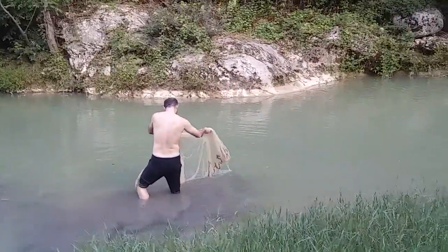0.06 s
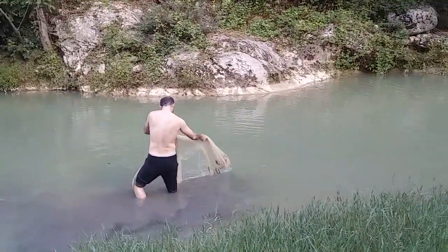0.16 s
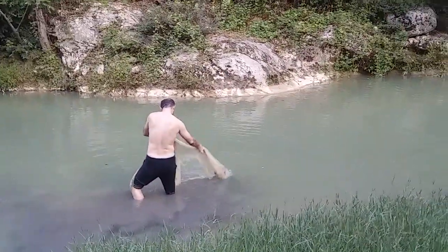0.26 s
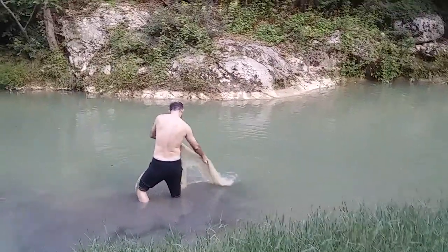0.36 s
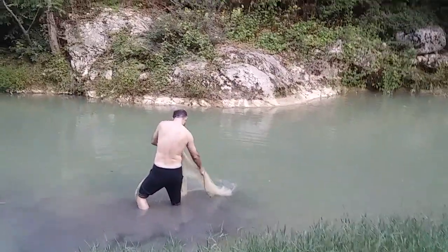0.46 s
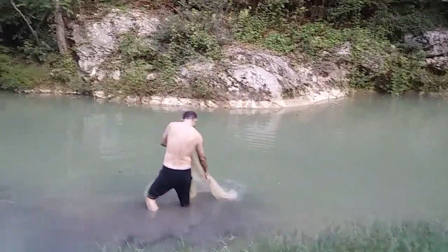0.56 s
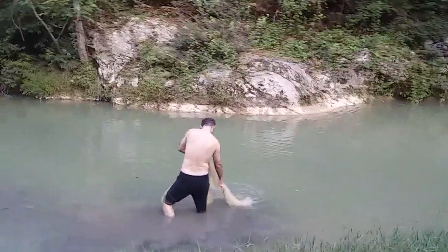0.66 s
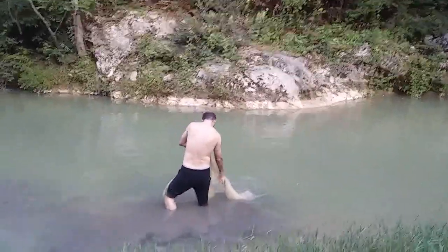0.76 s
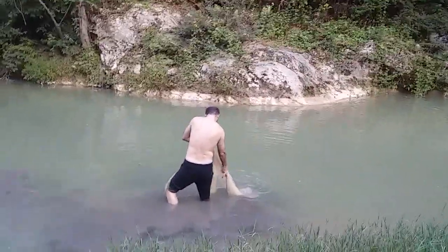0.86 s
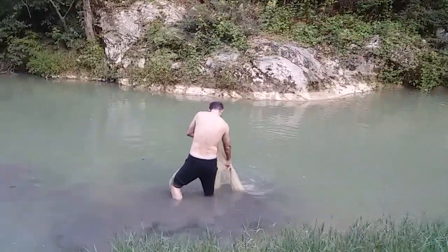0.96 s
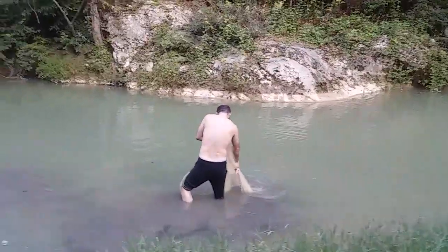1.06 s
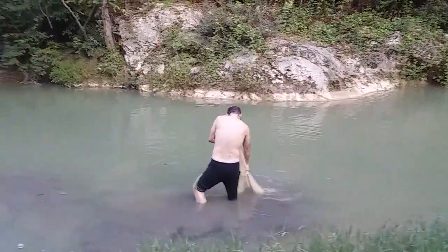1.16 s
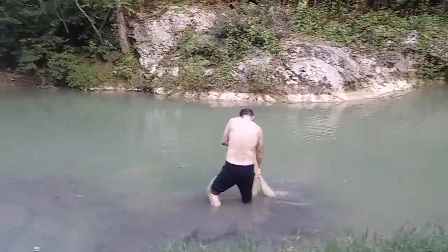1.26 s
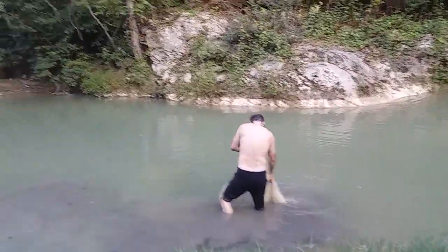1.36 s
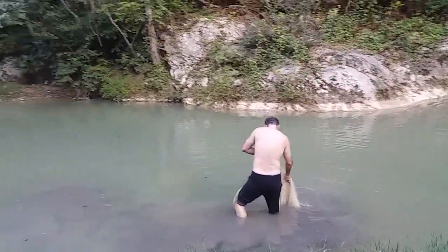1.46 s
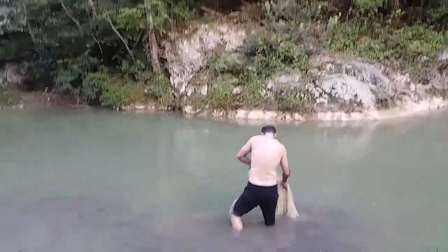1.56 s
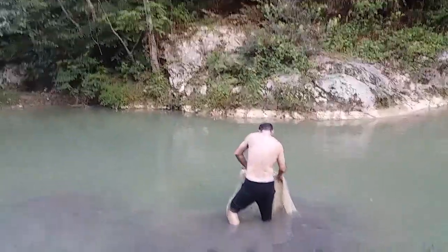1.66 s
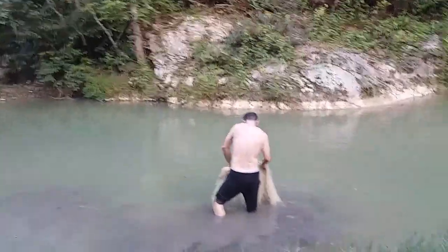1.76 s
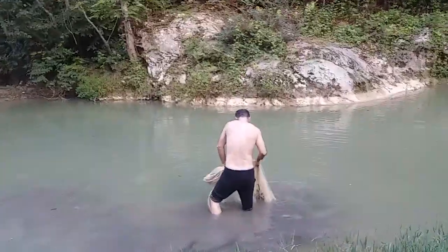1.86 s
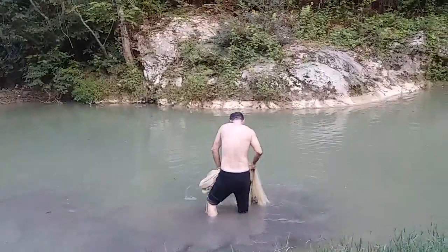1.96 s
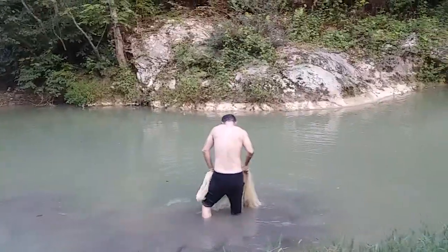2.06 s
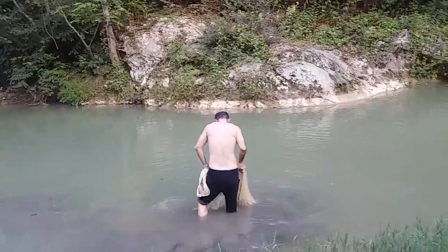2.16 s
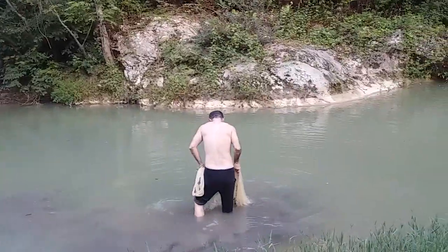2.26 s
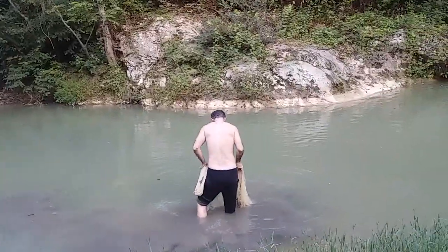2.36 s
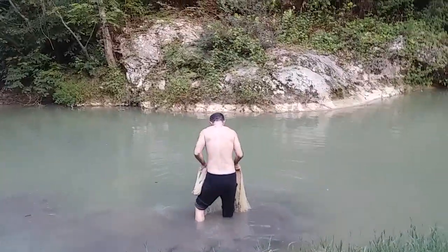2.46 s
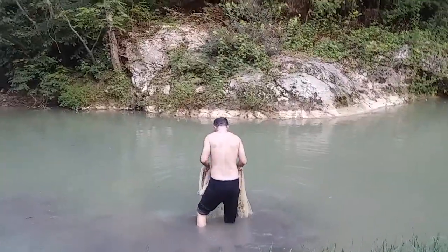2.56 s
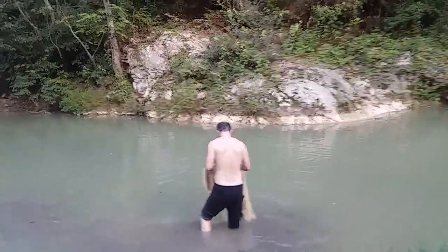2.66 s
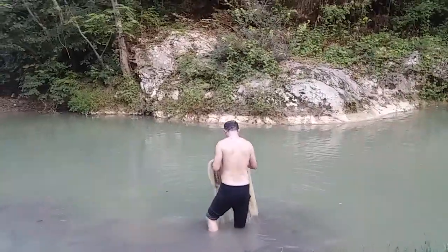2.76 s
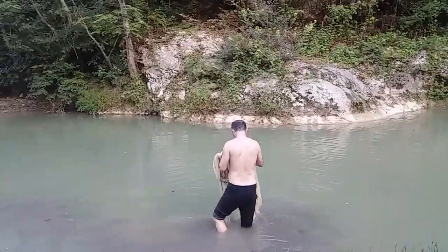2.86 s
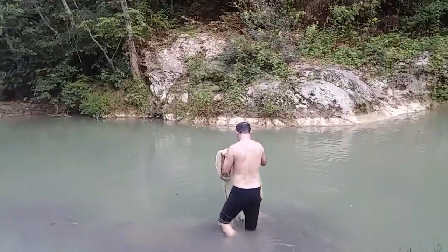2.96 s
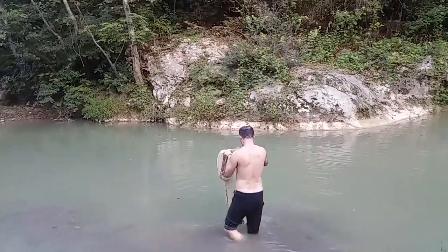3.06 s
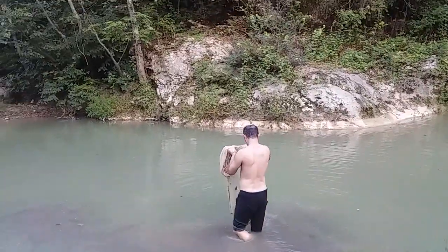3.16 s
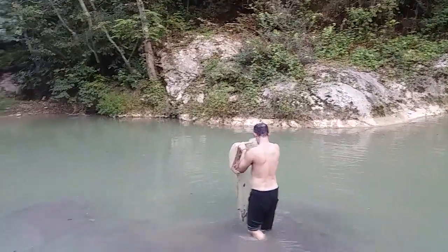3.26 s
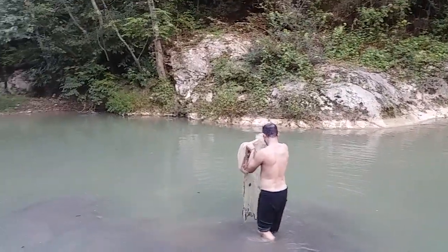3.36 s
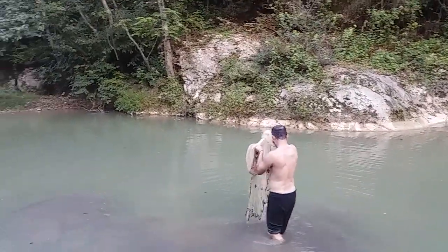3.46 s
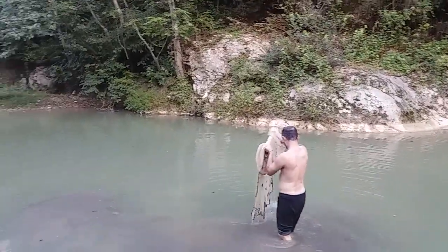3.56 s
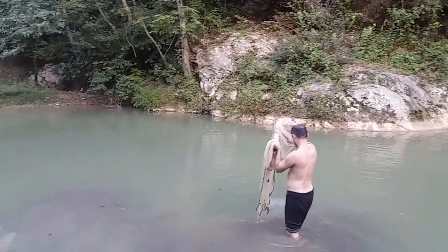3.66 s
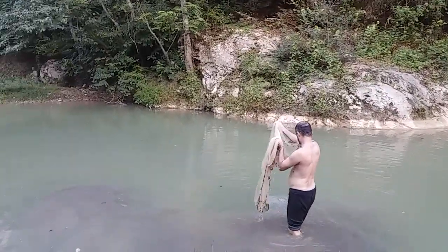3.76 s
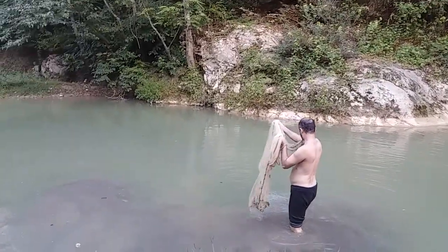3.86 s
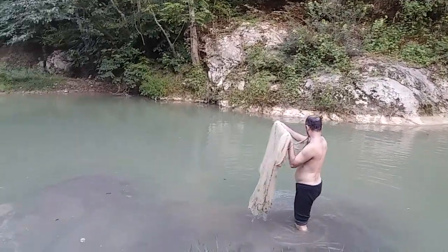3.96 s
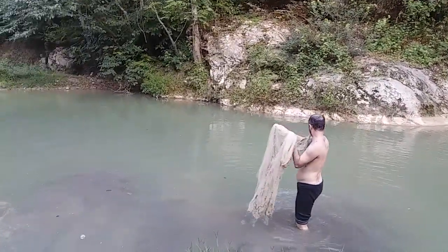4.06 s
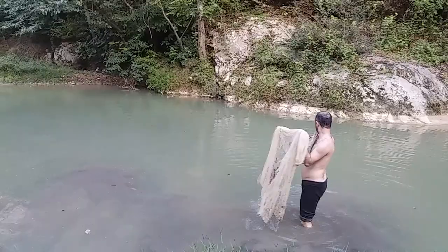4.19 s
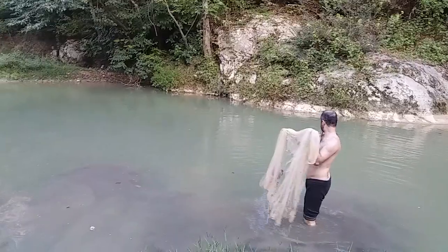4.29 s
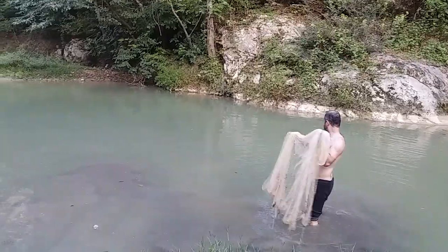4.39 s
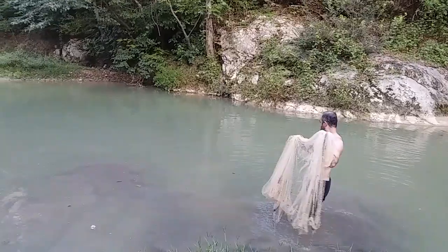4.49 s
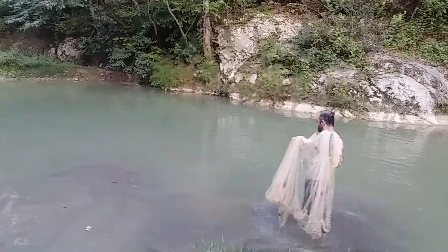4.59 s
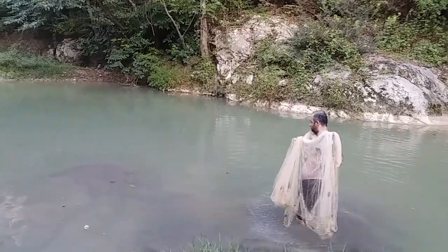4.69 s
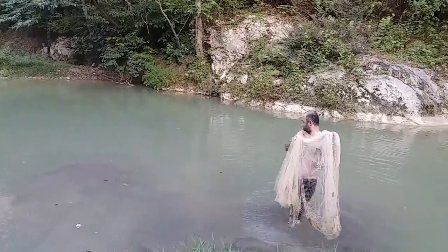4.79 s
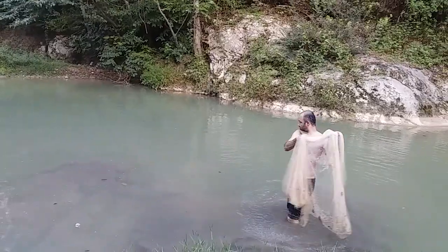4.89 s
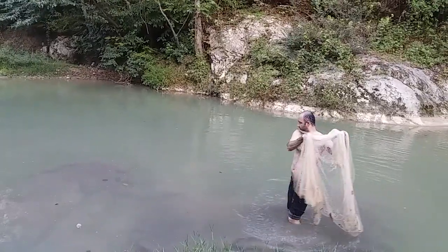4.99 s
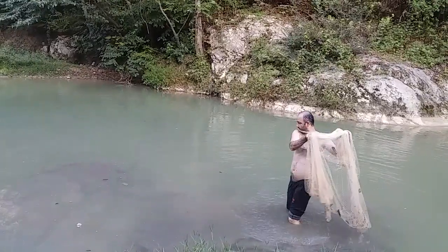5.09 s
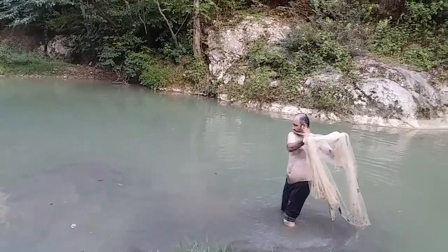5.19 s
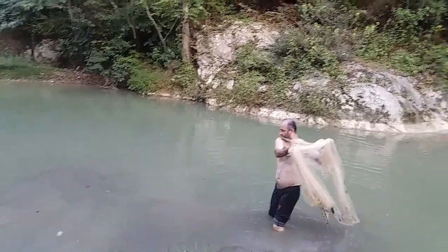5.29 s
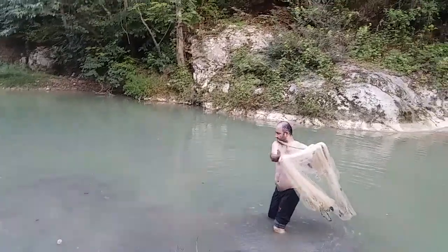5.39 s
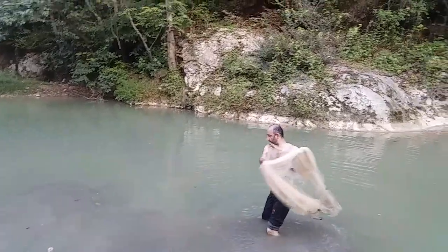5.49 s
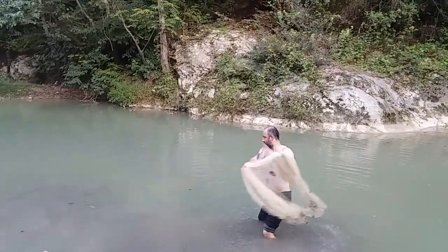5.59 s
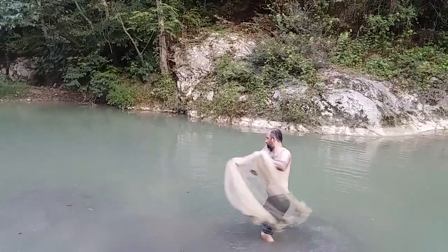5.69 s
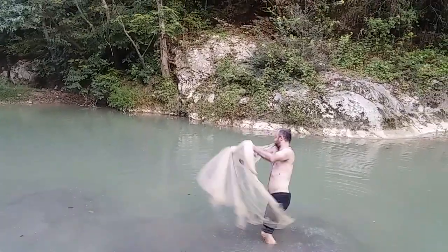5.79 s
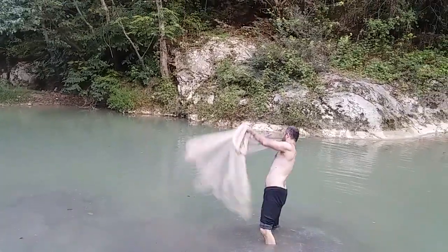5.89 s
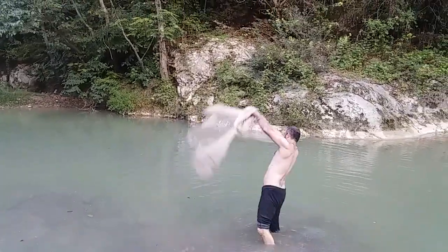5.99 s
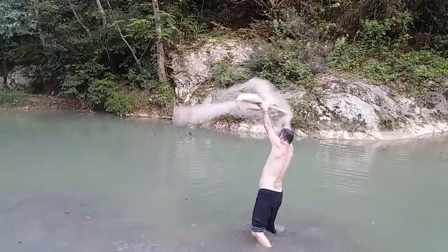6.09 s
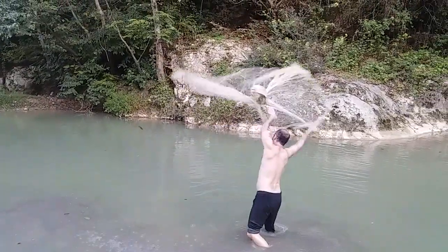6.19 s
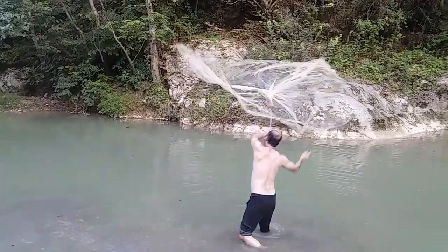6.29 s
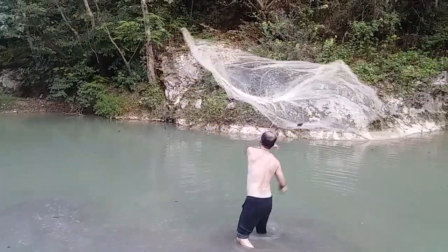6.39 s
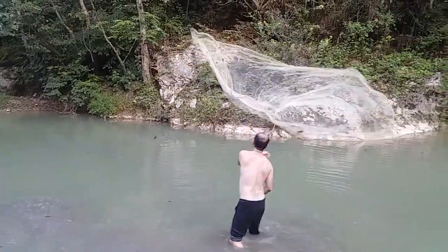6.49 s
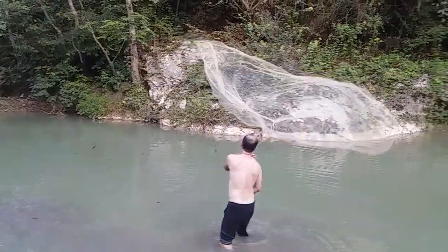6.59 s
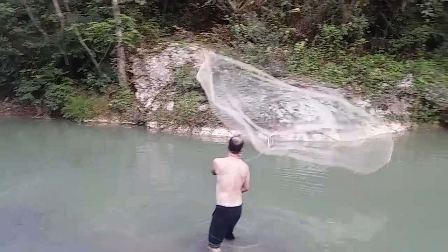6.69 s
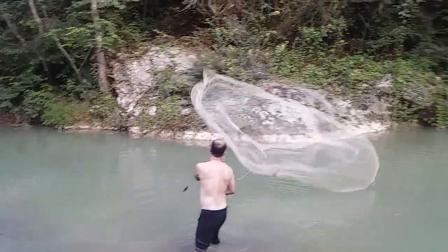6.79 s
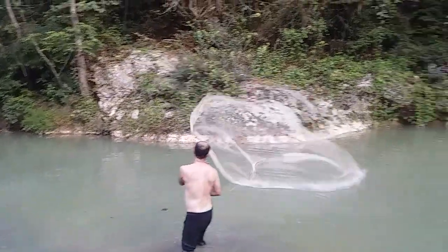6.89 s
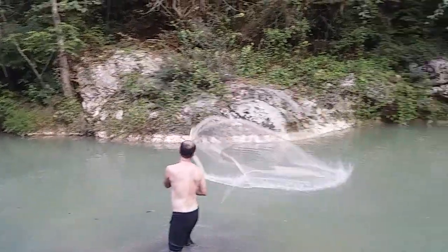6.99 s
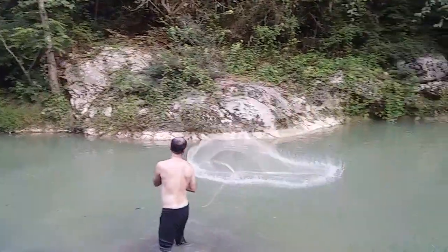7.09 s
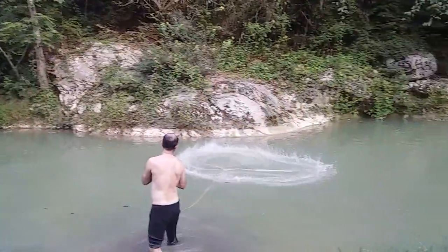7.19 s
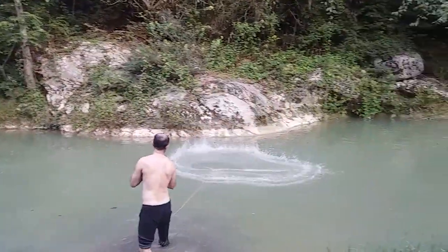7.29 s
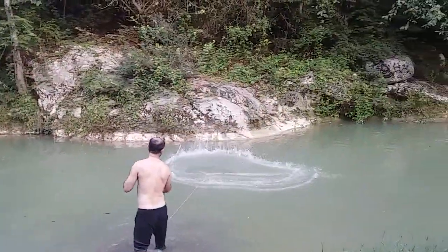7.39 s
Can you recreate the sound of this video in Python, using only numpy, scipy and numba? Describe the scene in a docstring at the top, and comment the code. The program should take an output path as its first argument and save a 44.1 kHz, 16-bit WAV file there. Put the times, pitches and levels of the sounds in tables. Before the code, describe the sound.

Quiet running water, crisp grass crunches under a few steps, legs sloshing and bright drips, then a weighted cast net bursts into the water.

```python
"""Wading in a shallow stream: legs stir the water, a gathered cast net drips, then its weighted rim lands
in a long splash. Water is built from swarms of ringing bubbles and drop impacts, with single gulps and drops on top.
Grass rustles, crackles and snaps under a few steps on the near bank, made of short knocks and ticks.
A noise wash with small bubbles babbles on as the stream, rock and bushes return a faint scattered echo,
and a thin steady sine whines high up."""
import sys
import numpy as np
from scipy import signal
from scipy.fft import rfft, irfft
from scipy.io import wavfile
from scipy.ndimage import uniform_filter1d
from numba import njit

SR = 44100
rng = np.random.default_rng(int(sys.argv[2]) if len(sys.argv) > 2 else 0)


def unload_wav(signal):
    """Save mono or channel-first audio to the path in sys.argv[1] as 16-bit WAV at rate SR, clipped to [-1, 1]."""
    wavfile.write(
        sys.argv[1],
        SR,
        np.round(np.clip(np.atleast_2d(signal).T, -1, 1) * 32767).astype(np.int16),
    )


N = 328545
TIME = np.arange(N) / SR

# Event levels are starting points: the layers that use them may trim, flutter or colour them.
# a leg pushes through the water: [peak t/s, rise/s, fall/s, slosh level/dB, deep surge level/dB]; 20 dB per rise or fall
STRIDES = [(.06, 0.41, 0.27, -54.5, -71), (.42, 0.45, 0.26, -49.5, -54.5), (1.38, 0.043, 0.076, -57, -59),
           (1.5, 0.1, 0.12, -51, -63.5), (3.06, 0.11, 0.098, -54, -74), (3.55, 0.54, 0.44, -49.5, -66),
           (5.73, .15, 0.072, -63, -88), (6.19, .3, 0.19, -51.5, -75), (6.44, 0.1, 0.13, -54, -62),
           (6.72, 0.17, 0.087, -52.5, -58)]
# the wet net is dipped, lifted or swung and sheds water:
# [peak t/s, rise/s, fall/s, dripping level/dB, fine spray level/dB]; 20 dB per rise or fall
NET_MOVES = [(.06, 0.41, 0.23, -55, -70), (.395, 0.3, 0.097, -42, -53), (3.95, 1, 0.76, -51, -61),
             (4.3, 0.62, 0.89, -62, -63.5), (5.04, 0.094, 0.14, -56.5, -86), (6.17, 0.36, 0.27, -56.5, -58),
             (6.66, 0.21, .45, -63, -68.5)]
# the largest drops off the net: [t/s, level/dB, starting f/Hz]
DROPS = [(0.0704, -37.5, 1550), (.1451, -28.5, 4160), (0.3227, -31, 3850), (0.3857, -27, 3200),
         (3.046, -37, 1910), (3.4435, -35.5, 1640), (3.708, -35.5, 6200), (3.849, -33, 4270),
         (3.906, -30.5, 5100), (3.9365, -33, 6600), (4.0077, -34.5, 3370), (4.0402, -25, 3960),
         (4.2722, -33, 5330), (4.323, -33, 6400), (4.5262, -36.5, 4530), (4.545, -35.5, 4680),
         (4.8664, -35, 4700)]
# the mesh pulls taut: [t/s, peak level/dB]
NET_TICKS = [(0.408, -27), (5.954, -34.5), (6.621, -39), (7.29, -28)]
# grass crackles softly as weight shifts on it: [peak t/s, rise/s, fall/s, level/dB]
SETTLING = [(.48, .1, 0.079, -45), (.84, 0.12, 0.16, -47.5), (2.04, 0.33, 0.22, -54)]
# a foot crushes grass: [t/s, hold/s, rustle level/dB, dry crackle level over the rustle/dB]
CRUNCHES = [(.486, .02, -39, -1), (.506, .028, -49, -1), (0.532, 0.012, -31, -12), (0.629, 0.16, -52, 5.5),
            (1.607, 0.12, -50, -8), (1.741, 0.065, -42.5, -4.5), (2.045, 0.074, -39.5, -5.5),
            (2.12, 0.031, -47, -4)]
# the thickest stalks snap: [t/s, level/dB, f/Hz]
SNAPS = [(.494, -24, 6650), (0.5451, -16, 7340), (0.5537, -21.5, 2270), (0.6396, -22.5, 7100),
         (0.656, -22.5, 3350), (.6833, -22, 7040), (.7223, -25, 7400), (.732, -22.5, 7500),
         (0.7737, -25, 5640), (.843, -25, 7300), (1.6074, -29, 7000), (1.6425, -27, 3140),
         (1.6658, -29, 1760), (1.683, -24.5, 2920), (1.7379, -23, 3060), (2.0361, -17, 3730),
         (2.0584, -26, 7200), (2.1078, -18, 6700), (2.1255, -27.5, 7820), (2.1474, -24, 4150)]
# blades of grass brush past each other, and the short last band is part of a stalk snap: [t/s, length/s,
# level/dB, centre f/Hz, width/Hz]
SWISHES = [(.99, 0.107, -57.5, 3160, 230), (1.02, 0.44, -64, 6940, 1100), (1.75, 0.049, -37.5, 2540, 1600),
           (1.94, 0.11, -51, 2770, 1200), (2.026, 0.024, -37, 3370, 860)]
# soft footfalls on the bank: [t/s, peak level/dB]
FOOTFALLS = [(1.61, -50), (1.648, -40), (3.047, -49)]
# large bubbles round the legs: [t/s, starting f/Hz, length/s, level/dB]
GULPS = [(1.483, 888, 0.045, -53), (3.558, 534, 0.023, -47), (3.667, 760, 0.017, -48),
         (3.822, 574, 0.092, -54.5), (4.066, 1150, .048, -51), (4.266, 1176, .034, -52.5),
         (5.695, 900, .05, -57), (6.389, 235, 0.031, -56.5), (6.66, 482, .125, -51.5)]
# parts of the net hit the water: [t/s, spray level/dB, finest spray level/dB]
TOUCHDOWNS = [(6.867, -46, -45.5), (6.922, -38, -44.5), (7.19, -40, -48)]
# stretches of mesh slap the surface: [t/s, length/s, level/dB]
SLAPS = [(6.929, 0.0062, -39.5), (7.204, 0.02, -38.5)]
# parts of the rim go under and churn up air: [t/s, hold/s, level/dB]
PLUNGES = [(6.947, 0.096, -34), (7.079, 0.049, -34.5), (7.191, 0.057, -38), (7.252, 0.046, -33.5)]
# the heaviest sinkers open air pockets: [t/s, level/dB, starting f/Hz]
SINKERS = [(6.9487, -18, 1160), (6.9626, -20, 606), (6.9715, -23.5, 450), (7.0157, -19, 1220),
           (7.0459, -19, 1180), (7.0941, -19, 504), (7.1072, -14.5, 1480), (7.1687, -27, 810),
           (7.2059, -23, 723), (7.2646, -20, 744), (7.2772, -23, 664), (7.2923, -17.5, 1170)]

# distant running water, wash and babble alike: [f/Hz, level/dB]
STREAM = [(25, -22), (65, -4.5), (110, -2.5), (250, -14), (420, -11), (800, -4), (1800, 1.5), (2400, -5.5),
          (3600, -5.5), (5600, -16), (6800, -8.5), (9500, -17.5), (15500, -37)]
# bubbles stirred up by the legs: [f/Hz, level/dB]
SLOSH = [(200, -17), (450, -18), (750, 0), (1500, 4), (2400, -3), (5000, -2.5)]
# deeper bubbles from a shove of the leg: [f/Hz, level/dB]
SURGE = [(120, -10), (220, -20.5), (450, 6), (700, 7), (1200, -18)]
# drops falling off the net: [f/Hz, level/dB]
DRIPPING = [(700, -19), (1800, -5), (3800, 4.5), (6000, -2), (8000, -10.5), (14000, -26)]
# the finest spray, and ticks of taut mesh: [f/Hz, level/dB]
MIST = [(3000, -11.5), (7000, -3.5), (12500, -2.5), (16000, -4)]
# spray of the landing net: [f/Hz, level/dB]
SPLASH = [(150, -39), (500, -16), (1300, 3), (2400, -0.5), (3600, 3.5), (6000, -2.5), (8000, -11.5),
          (14000, -20)]
# air dragged under by the rim: [f/Hz, level/dB]
CHURN = [(120, -14), (220, -12.5), (330, 1), (500, 0.5), (900, -1), (1300, -1), (2000, -8.5), (3500, -16)]
# rustling leaves: [f/Hz, level/dB]
LEAVES = [(150, -34), (450, -15.5), (1400, 0), (2200, -3), (3300, 3), (4200, -5.5), (5500, -9.5),
          (9000, -3.5), (16000, 2)]
# crackling dry stalks: [f/Hz, level/dB]
STALKS = [(500, -19), (3000, -15), (5400, -5), (7400, -0.5), (8500, -1.5), (10500, -8.5), (13000, -21),
          (16000, -21)]
# snapping grass: [f/Hz, level/dB]
GRASS = [(50, -55), (200, -44), (450, -21), (1400, -8.5), (3300, -5.5), (5200, -17), (7400, -0.5),
         (8500, -4), (10500, -7), (13000, -21), (16000, -28)]
# response of the microphone and its port: [f/Hz, level/dB]
MICROPHONE = [(20, -20), (60, -3), (8000, 0), (9300, -15.5), (10700, -13.5), (12400, 0), (16000, 1)]

STREAM_DB = -56.5
WHINE_DB, WHINE_HZ = -78, 14593
FAT_DROPS_DB = -7  # sparse large drops, relative to the dripping
SMALL_SNAPS_DB = -1  # sparse snaps, relative to the crackle gain
CRUNCH_ATTACK_S, CRUNCH_FALL_S = 0.0039, 0.019
GULP_RISE_OCTAVES_PER_S = 17  # total climb per second of bubble length
TOUCH_ATTACK_S = 0.008
SPRAY_HOLD_S, SPRAY_FALL_S = 0.043, 0.81
MIST_HOLD_S, MIST_FALL_S = 0.02, 0.43
PLUNGE_ATTACK_S, PLUNGE_FALL_S = 0.012, 0.11
DEEP_LAG_S, DEEP_DB = 0.034, -10.5  # the largest air pockets close later
TOP_HZ = 15900


def undb(db):
    """Decibels to gain."""
    return 10 ** (np.asarray(db) / 20)


def unit(x):
    """Scale to rms 1."""
    return x / np.sqrt(np.mean(x ** 2) + 1e-18)


def add(out, s, x):
    """Mix x into out at time s in seconds."""
    i = max(int(s * SR), 0)
    out[i:i + len(x)] += x[:max(N - i, 0)]


def colour(x, points):
    """Minimum-phase filter through the given (Hz, dB) points, so nothing sounds ahead of its onset."""
    hz, db = np.transpose(points)
    size = 2048
    grid = np.maximum(np.fft.rfftfreq(size, 1 / SR), 1)
    response = undb(np.interp(np.log(grid), np.log(hz), db))
    # folding the cepstrum onto positive time makes the filter causal
    cepstrum = irfft(np.log(response))
    cepstrum[1:size // 2] *= 2
    cepstrum[size // 2 + 1:] = 0
    impulse = irfft(np.exp(rfft(cepstrum)))
    return signal.fftconvolve(x, impulse)[:len(x)]


def flutter(per_s, depth_db):
    """Random gain held for a moment at a time, so drops and cracks come in clusters; rms 1."""
    hold = max(int(SR / per_s), 50)
    steps = rng.standard_normal(N // 50 + 1)[np.arange(N) // hold]
    return unit(undb(depth_db * uniform_filter1d(steps, hold // 3)))


def swells(rows):
    """Gain of overlapping (peak s, rise s, fall s, dB) swells; rise and fall span 20 dB."""
    power = 0
    for s, rise, fall, db in rows:
        below_db = 20 * np.maximum((s - TIME) / rise, (TIME - s) / fall)
        power = power + undb(db - np.minimum(below_db, 100)) ** 2
    return np.sqrt(power)


def impacts(rows, attack_s, fall_s):
    """Gain of overlapping (s, hold s, dB) impacts: a quick attack, a hold, then 20 dB down per fall time."""
    power = 0
    for s, hold, db in rows:
        attack = np.clip((TIME - s) / attack_s, 0, 1)
        below_db = 20 * np.clip((TIME - s - hold) / fall_s, 0, 10)
        power = power + (attack * undb(db - below_db)) ** 2
    return np.sqrt(power)


def bursts(table, edge):
    """Gain of (s, length s, dB) bursts; edge is the share of the length spent on rounded ends."""
    gain = np.zeros(N)
    for s, length, db in table:
        window = signal.windows.tukey(max(int(length * SR), 8), min(edge, 1))
        add(gain, s, undb(db) * window)
    return gain


@njit
def ring(starts, hz, cycles, size, rise):
    """Damped sines that fade 50 dB within their cycles while the pitch climbs."""
    out = np.zeros(N)
    for k in range(len(starts)):
        first = int(starts[k] * SR)
        count = int(cycles[k] * SR / hz[k]) + 2
        gain, fade, phase = size[k], np.exp(-5.75 / count), 0.
        for i in range(min(count, N - first)):
            phase += 2 * np.pi * hz[k] * (1 + rise * i / count) / SR
            out[first + i] += gain * np.sin(phase)
            gain *= fade
    return out


def swarm(per_s, low_hz, high_hz, cycles, spread_db, rise, spectrum):
    """Random bubbles or ticks at a steady mean rate; a wider spread makes a few much larger; rms 1."""
    when, pitch, life, size = rng.random((int(per_s * N / SR), 4)).T
    hz = low_hz * (min(high_hz, .4 * SR) / low_hz) ** pitch
    # height in proportion to pitch keeps the power per Hz even ahead of the colouring
    height = undb(-spread_db * np.log(0.012 + size)) * hz
    rings = ring(when * N / SR, hz, cycles * (.5 + life), height, rise)
    return unit(colour(rings, spectrum))


def pop(hz, cycles, rise, attack):
    """One bubble or damped knock: it swells (attack in cycles), then rings away as pitch climbs by rise; peak 1."""
    turn = np.arange(int(cycles * SR / hz) + 8) * hz / SR
    tone = np.sin(2 * np.pi * turn * (1 + rise * turn / cycles / 2))
    decay = np.exp(-np.log(300) * turn / cycles)
    wave = tone * decay * (1 - np.exp(-turn / attack))
    return wave / np.abs(wave).max()


def tick(decay_s, spectrum):
    """A very short burst of coloured noise; peak 1."""
    t = TIME[:2048]
    wave = colour(rng.standard_normal(len(t)) * np.exp(-t / decay_s), spectrum)
    return wave / np.abs(wave).max()


def stream():
    """A distant riffle: a smooth noise wash with small ringing bubbles that come and go."""
    wash = unit(colour(rng.standard_normal(N), STREAM))
    babble = swarm(per_s=600, low_hz=591, high_hz=4610, cycles=58.5, spread_db=1.0, rise=0.304, spectrum=STREAM)
    babble = babble * undb(-2.5) * flutter(per_s=30, depth_db=1.3)
    return undb(STREAM_DB) * (wash + babble)


def whine():
    """A faint high whine: one steady sine."""
    return undb(WHINE_DB) * unit(np.sin(2 * np.pi * WHINE_HZ * TIME))


def wading():
    """Legs stir up bubbles, deeper ones when they shove; the lifted net sheds drops, patter and fine spray."""
    slosh = swarm(per_s=750, low_hz=444.5, high_hz=3030, cycles=34, spread_db=3.5, rise=0.26, spectrum=SLOSH)
    surge = swarm(per_s=450, low_hz=195.5, high_hz=1120, cycles=13, spread_db=4, rise=0.37, spectrum=SURGE)
    strides = np.array(STRIDES)
    legs = slosh * swells(strides[:, :4])
    legs += surge * swells(np.delete(strides, 3, axis=1))

    # long rings are bubbles under the drops, short ones the drop impacts
    drips = swarm(per_s=1400, low_hz=1103, high_hz=9070, cycles=38, spread_db=2.5, rise=0.27, spectrum=DRIPPING)
    fat_drops = swarm(per_s=50, low_hz=1896, high_hz=6850, cycles=58, spread_db=3, rise=0.15, spectrum=DRIPPING)
    patter = swarm(per_s=1500, low_hz=1090, high_hz=8800, cycles=5.5, spread_db=8, rise=0, spectrum=DRIPPING)
    hard_drops = swarm(per_s=45, low_hz=2530, high_hz=9100, cycles=6.6, spread_db=1.5, rise=0, spectrum=DRIPPING)
    mist = swarm(per_s=2400, low_hz=5030, high_hz=17100, cycles=5.9, spread_db=2.0, rise=0, spectrum=MIST)
    moves = np.array(NET_MOVES)
    dripping = drips * undb(-2.0) + patter * undb(-6.0) + (fat_drops + hard_drops) * undb(FAT_DROPS_DB)
    runoff = dripping * swells(moves[:, :4])
    runoff += mist * swells(np.delete(moves, 3, axis=1)) * undb(5.0)
    return legs + runoff * flutter(per_s=90, depth_db=2.5)


def banks(x, t60_s, onset_s):
    """Scattered echo off rock and bushes: a decaying noise tail that ramps in, its bass a touch thinner."""
    t = TIME[:SR // 2]
    tail = rng.standard_normal(len(t)) * undb(-60 * t / t60_s) * np.minimum(t / onset_s, 1)
    tail = colour(tail, [(200, -1.1), (2000, -0.67), (9000, -0.16)])
    return signal.fftconvolve(x, tail / np.linalg.norm(tail))[:N]


def drops():
    """Each drop ticks on the surface and leaves a small ringing bubble; taut mesh gives a few thin ticks."""
    out = np.zeros(N)
    for s, db, hz in DROPS:
        add(out, s, undb(db - 11.0) * tick(0.0059, DRIPPING))
        add(out, s, undb(db - 1.0) * pop(hz, cycles=22, rise=0.077, attack=0.32))
    for s, db in NET_TICKS:
        add(out, s, undb(db) * tick(0.002, MIST))
    return out


def grass():
    """Steps on the bank: leaves rustle, dry stalks crackle and snap, the soil thuds softly."""
    rustle = swarm(per_s=4000, low_hz=493, high_hz=8740, cycles=9.3, spread_db=1.0, rise=0, spectrum=LEAVES)
    crackle = swarm(per_s=1800, low_hz=3060, high_hz=13600, cycles=2.1, spread_db=2.5, rise=0, spectrum=STALKS)
    small_snaps = swarm(per_s=51, low_hz=2560, high_hz=8500, cycles=1.6, spread_db=4.0, rise=0, spectrum=GRASS)
    leaf_rows = [row[:3] for row in CRUNCHES]
    stalk_rows = [(s, hold, db + dry_db) for s, hold, db, dry_db in CRUNCHES]
    leaf_gain = impacts(leaf_rows, CRUNCH_ATTACK_S, CRUNCH_FALL_S)
    stalk_gain = impacts(stalk_rows, CRUNCH_ATTACK_S, CRUNCH_FALL_S)
    settling = swells(SETTLING)
    out = rustle * np.hypot(leaf_gain, settling * undb(-3))
    out += crackle * np.hypot(stalk_gain, settling)
    out *= flutter(per_s=100, depth_db=2.0)
    out += small_snaps * stalk_gain * undb(SMALL_SNAPS_DB)
    for s, length, db, hz, width in SWISHES:
        band = signal.butter(2, [hz - width / 2, hz + width / 2], "band", fs=SR, output="sos")
        swish = unit(signal.sosfilt(band, rng.standard_normal(N)))
        out += swish * bursts([(s, length, db)], edge=0.49)
    for s, db, hz in SNAPS:
        add(out, s, undb(db + 1.5) * tick(0.0004, GRASS))
        add(out, s, undb(db - 0.5) * pop(hz, cycles=9.7, rise=0, attack=0.29))
    for s, db in FOOTFALLS:
        # soft ground rings for less than a cycle
        add(out, s, undb(db) * pop(hz=164, cycles=0.66, rise=0, attack=0.15))
    return out


def gulps():
    """An air pocket holds its note, then sweeps up and fades near the surface; longer ones climb further."""
    out = np.zeros(N)
    for s, hz, length, db in GULPS:
        age = np.linspace(0, 1, int(length * SR))
        octaves = GULP_RISE_OCTAVES_PER_S * length * age ** 3
        phase = 2 * np.pi * np.cumsum(hz * 2 ** octaves) / SR
        swell = np.minimum(age / .07, 1) * (1 - age ** 4)
        add(out, s, undb(db) * np.sin(phase) * swell)
    return out * flutter(per_s=180, depth_db=3.5)


def landing():
    """The mesh tears up spray, the finest of which dies first; the sinkers follow and drag air under."""
    spray = swarm(per_s=6000, low_hz=517, high_hz=12600, cycles=6.9, spread_db=0.5, rise=0.16, spectrum=SPLASH)
    mist = swarm(per_s=8100, low_hz=4740, high_hz=16000, cycles=17, spread_db=3.0, rise=0, spectrum=MIST)
    spray_rows = [(s, SPRAY_HOLD_S, db) for s, db, _ in TOUCHDOWNS]
    mist_rows = [(s, MIST_HOLD_S, db) for s, _, db in TOUCHDOWNS]
    out = spray * impacts(spray_rows, TOUCH_ATTACK_S, SPRAY_FALL_S) * undb(1.6)
    out += mist * impacts(mist_rows, TOUCH_ATTACK_S, MIST_FALL_S) * undb(4.5)
    out += (spray + undb(4) * mist) * bursts(SLAPS, edge=0.69)

    churn = swarm(per_s=700, low_hz=335, high_hz=1980, cycles=16.4, spread_db=2.5, rise=0.29, spectrum=CHURN)
    deep = swarm(per_s=300, low_hz=205, high_hz=352, cycles=9.8, spread_db=0, rise=0.15, spectrum=CHURN)
    deep_rows = [(s + DEEP_LAG_S, hold, db + DEEP_DB) for s, hold, db in PLUNGES]
    out += churn * impacts(PLUNGES, PLUNGE_ATTACK_S, PLUNGE_FALL_S)
    out += deep * impacts(deep_rows, attack_s=0.018, fall_s=0.045)
    for s, db, hz in SINKERS:
        add(out, s, undb(db - 4.5) * pop(hz, cycles=18.0, rise=0.084, attack=0.54))
    # small bubbles radiate little deep bass
    return signal.sosfilt(signal.butter(1, 170, "high", fs=SR, output="sos"), out)


def scene():
    """Water out in the stream, grass close by with less echo, and a faint high whine."""
    water = wading() + gulps() + drops() + landing()
    steps = grass()
    echo = banks(undb(-13) * water + undb(-16.5) * steps, t60_s=0.95, onset_s=0.0069)
    return (water + steps + echo + stream() + whine())[None]


def record(dry):
    """The microphone thins the deep bass and its port hollows out the upper treble; the top is cut."""
    heard = colour(dry[0], MICROPHONE)
    return signal.sosfilt(signal.ellip(10, .2, 70, TOP_HZ, fs=SR, output="sos"), heard)[None]


dry = scene()
out = record(dry)
unload_wav(out)
```